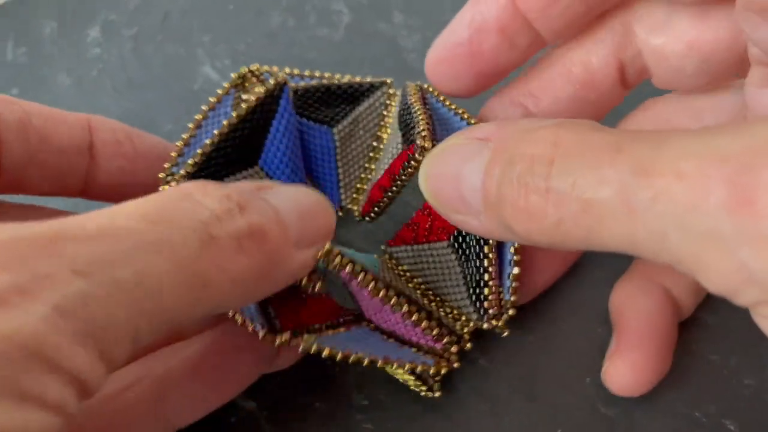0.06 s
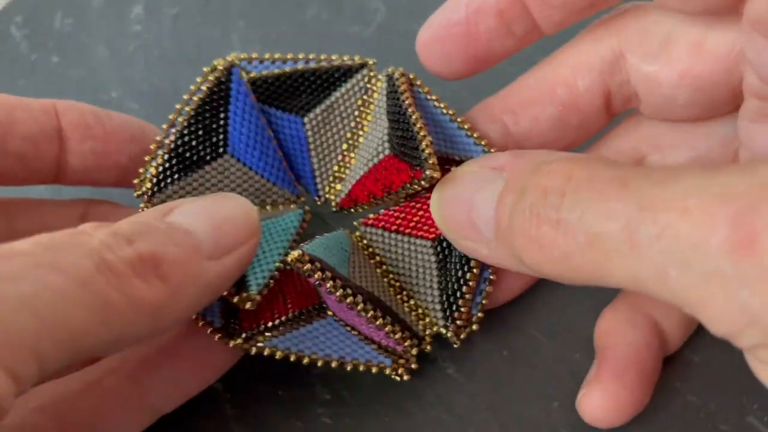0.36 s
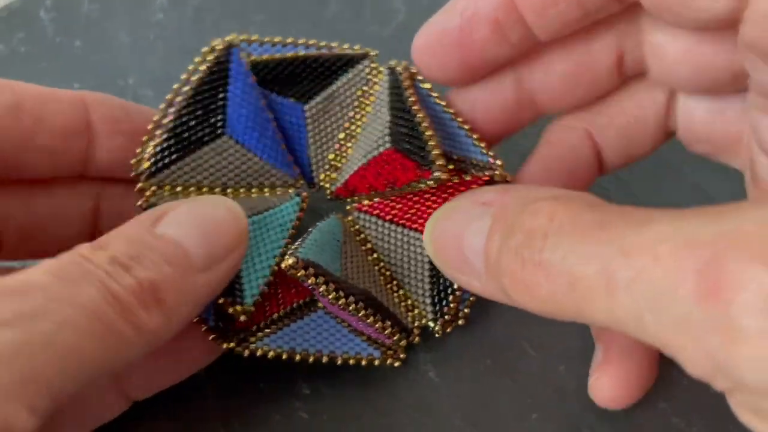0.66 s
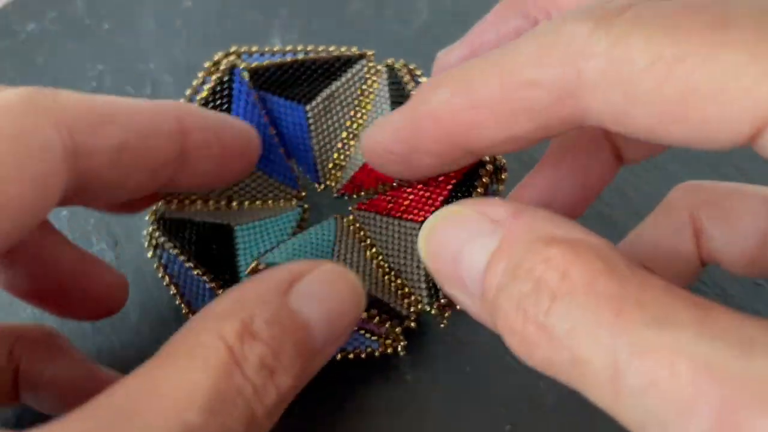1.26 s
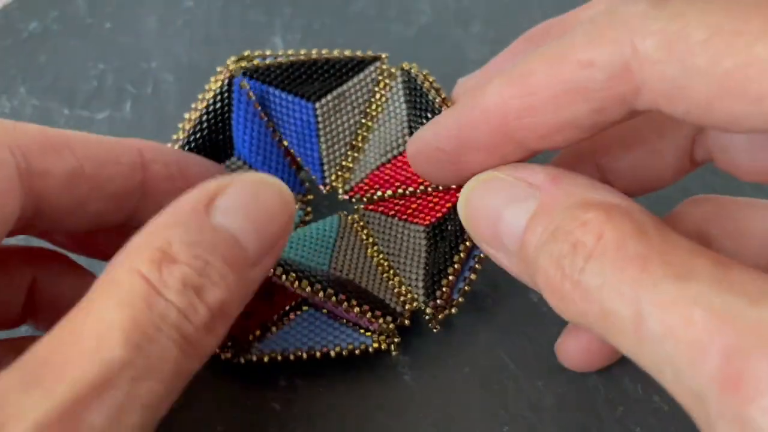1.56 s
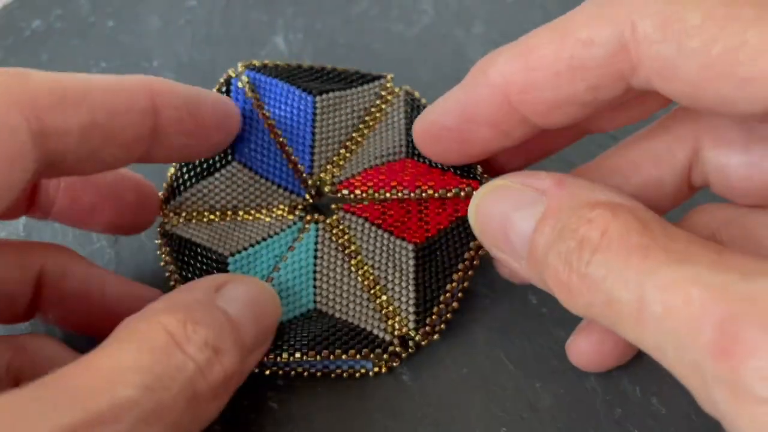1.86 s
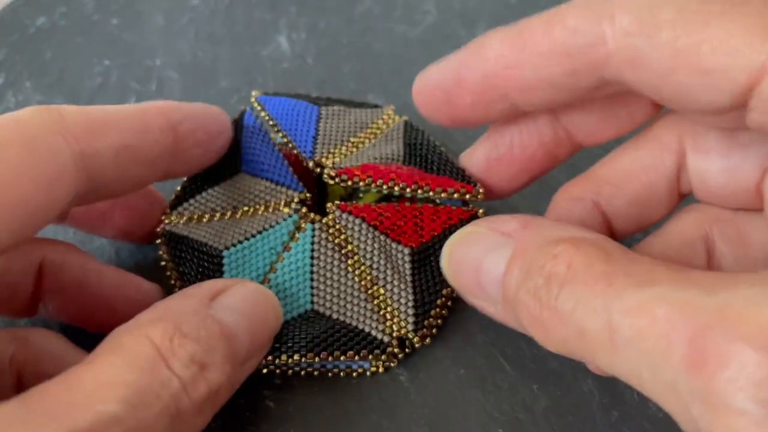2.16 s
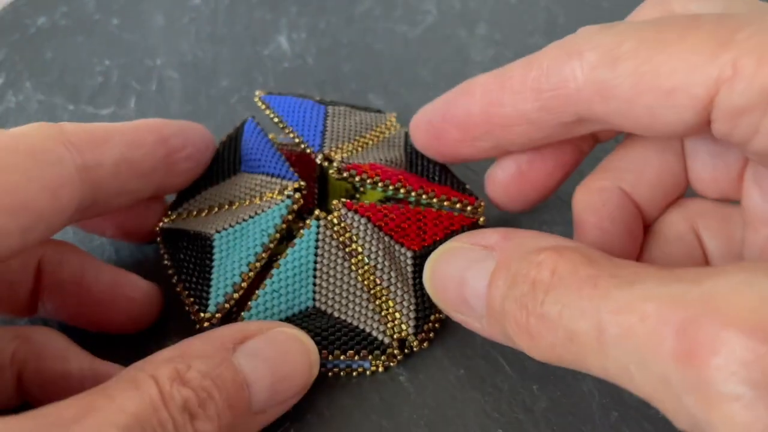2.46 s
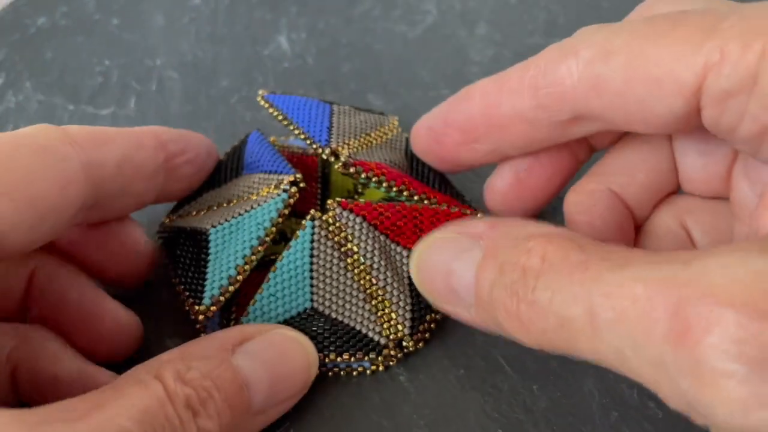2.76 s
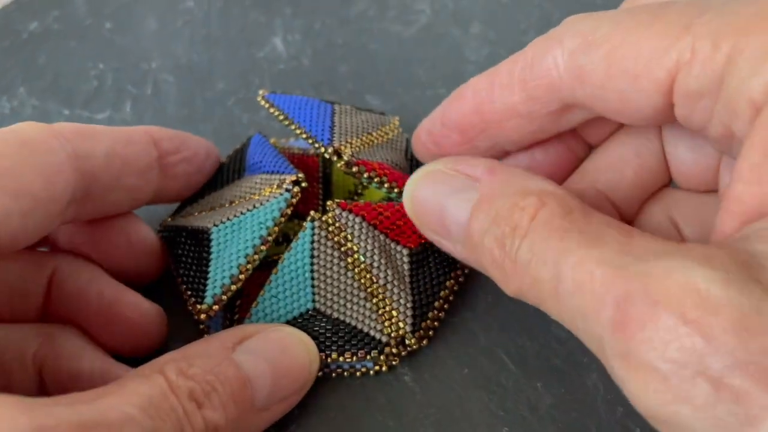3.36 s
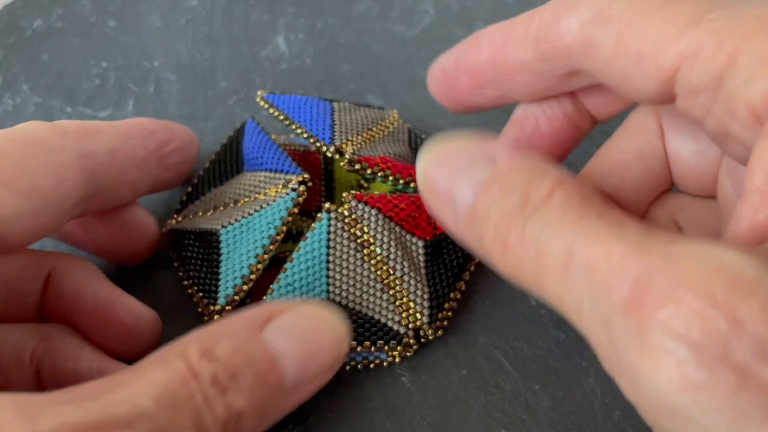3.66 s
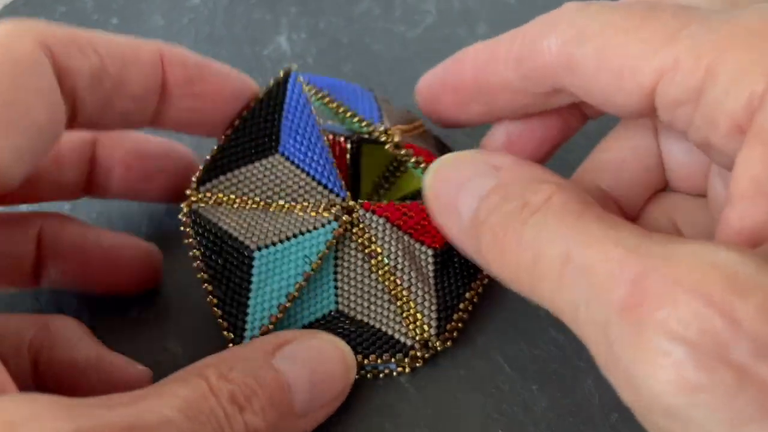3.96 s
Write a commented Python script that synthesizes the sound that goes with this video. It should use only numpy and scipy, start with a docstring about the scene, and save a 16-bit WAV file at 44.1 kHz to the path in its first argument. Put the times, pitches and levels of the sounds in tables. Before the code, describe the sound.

Close up, beadwork drags and taps on stone in short, soft bursts, creaks briefly near the middle, then moves more sparsely. Fingertips brush the beads and a few tick together, over a low indoor rumble.

```python
"""Beadwork handled on slate

Hands turn and fold a ring of beadwork on a slate slab in a quiet room. Stick-slip friction and knocks
of the beaded edges drive the slab's damped modes, which ring dully; one fold creaks. Fingertips hiss
over the beads, and now and then two beads collide with a tick. Underneath lie room noise, a faint hum
and a low drone that slowly climbs, like a distant engine."""
import sys
import numpy as np
from scipy import signal
from scipy.fft import rfft, irfft
from scipy.io import wavfile

SR = 44100
rng = np.random.default_rng(int(sys.argv[2]) if len(sys.argv) > 2 else 0)


def to_wav(s):
    """Save 16-bit WAV."""
    ch = np.atleast_2d(s).T  # columns
    pcm = np.round(np.clip(ch, -1, 1) * 32767)  # PCM
    wavfile.write(sys.argv[1], SR, pcm.astype(np.int16))


N = 176400
TIME = np.arange(N) / SR
FREQS = np.maximum(np.arange(N // 2 + 1) * SR / N, 1)

# room noise spectrum: (f/Hz, relative density/dB)
ROOM_SPECTRUM = [(30, -20.5), (42, 6.5), (65, 5), (105, -6.5), (170, -8), (270, -11), (370, -20.5),
                 (650, -21.5), (1200, -26), (2300, -44.5), (5000, -57.5), (15000, -107)]
# likeness of left and right in the room noise: (f/Hz, correlation)
ROOM_COHERENCE = [(50, 0.86), (130, 0.86), (300, 0.39), (1100, 0.033), (3000, 0.64)]
# balance of the room noise: (f/Hz, left minus right/dB)
ROOM_BALANCE = [(60, 0.5), (140, 1)]
# course of the drone: (t/s, f/Hz, level/dB)
DRONE_GLIDE = [(0, 47.1, -51.5), (.3, 47.24, -56), (1.4, 44.98, -59), (1.62, 47.1, -45),
               (1.95, 53.54, -44.5), (2.75, 53.48, -43), (3.17, 55.04, -45), (3.41, 61.58, -52.5),
               (3.85, 65.7, -46), (4, 67.34, -57)]
# lines of the hum: (f/Hz, level/dB)
HUM_LINES = [(92, -68.5), (120, -67), (143, -68)]
# hand strokes: (start t/s, duration/s, relative drag level/dB, relative brush level/dB)
HAND_STROKES = [(0.0, 0.079, -61.5, -72), (0.145, 0.12, -69, -78.5), (0.338, 0.16, -76, -77),
                (0.482, 0.033, -57.5, -70), (0.561, 0.17, -65.5, -67.5), (0.734, 0.07, -58.5, -67.5),
                (0.795, 0.18, -73.5, -78.5), (1.224, 0.056, -64.5, -74), (1.288, .065, -67.5, -76),
                (1.38, 0.045, -74, -88), (1.5, 0.13, -81.5, -92), (1.619, 0.04, -59.5, -75),
                (1.703, 0.052, -60.5, -74.5), (1.776, 0.051, -54.5, -72.5), (1.873, 0.068, -66, -76.5),
                (2.004, 0.12, -72, -91), (2.213, 0.052, -74.5, -84.5), (2.3, 0.13, -72.5, -82),
                (2.567, 0.051, -65, -85), (2.602, 0.027, -60, -72.5), (2.671, 0.028, -67.5, -77.5),
                (2.71, 0.098, -83.5, -85), (2.851, 0.05, -72.5, -81.5), (2.947, 0.057, -80.5, -76),
                (3.591, 0.047, -63.5, -73.5), (3.625, 0.021, -61, -71.5), (3.736, 0.022, -56.5, -71.5),
                (3.861, 0.064, -71, -74.5), (3.899, 0.034, -61.5, -70.5)]
# spectrum of skin sliding on beads: (f/Hz, relative density/dB)
SKIN_SPECTRUM = [(500, 11), (2500, 2), (4000, 4), (6000, 6), (7500, 9), (9500, 7), (12000, 3.5),
                 (15500, 7.5)]
# bead striking bead: (t/s, relative level/dB)
BEAD_TICKS = [(1.570, -59), (1.884, -46), (2.072, -46), (2.111, -46), (2.523, -56.5), (2.757, -56),
              (3.264, -57)]
# spectrum of the dry grit of slipping beads: (f/Hz, relative density/dB)
GRIT_SPECTRUM = [(300, 12), (700, -16), (1150, 28), (1500, 5), (2600, -19), (4200, 12), (7000, -14),
                 (15500, -23)]
# an edge slips and judders on the slab: (t/s, relative level/dB)
EDGE_KNOCKS = [(.004, -40), (.032, -41), (.055, -40), (.170, -46.5), (.195, -53), (.220, -46),
               (.497, -47.5), (.53, -46.5), (.619, -50), (.655, -61), (.691, -50), (.746, -47),
               (.769, -42.5), (1.238, -47.5), (1.273, -48.5), (1.295, -55), (1.351, -51), (1.55, -52),
               (1.619, -41), (1.693, -45.5), (1.732, -45), (1.791, -44), (1.813, -32.5), (1.884, -46.5),
               (1.924, -46.5), (1.962, -47), (2.024, -52.5), (2.238, -50.5), (2.617, -39), (2.688, -49.5),
               (3.033, -54.5), (3.894, -47.5), (3.914, -43)]
# where the beadwork bears on the slab: (t/s, dimensionless place)
CONTACT_PLACE = [(.2, -1.6), (.7, -0.019), (1.25, 0.83), (1.83, 1), (2.48, -0.042), (2.61, 0.89),
                 (2.69, 0.39), (3.6, -0.72), (3.76, 0.36)]
# slab modes: (f/Hz, bandwidth/Hz, gain/dB, phase lead of the left/rad, gain per unit place/dB)
SLAB_MODES = [(830.5, 23.5, 6.5, 0.23, 0), (1781, 27, -6, 0.93, 1.5), (1909, 82, -6.5, 0.24, -1.5),
              (3060, 18, -15.5, 1, 1), (3122, 45, -11, 0.28, -1.5), (3397, 48, -13, 0.57, 3),
              (4683, 45, -13.5, 0.18, -1), (5067, 59, -9, 0.18, 3), (5360, 59, -17.5, 0.21, -1),
              (7280, 100, -18.5, 0.072, -2)]
# phase between left and right in the contact sounds: (f/Hz, phase/rad, limited to pi in use)
TREBLE_STEREO_PHASE = [(6000, 0.2), (7300, 1.88), (8300, 4.35), (9400, 1.36), (11500, 0.25), (13600, 1.9),
                       (15200, 3.7)]

ROOM_DB, DRONE_PAN_DB, HUM_WAVER_DB = -51.5, -2.5, 4.5
STROKE_RISE_SHARE, STROKE_ARCH_DB = 0.56, 0.5   # rise time over duration; middle above ends
CATCHES_PER_S, CATCH_DECAY_S, CATCH_DEPTH = 130, 0.0024, 0.58
SKIN_GAIN_DB, GRIT_GAIN_DB = 4.5, -14.5
TICK_T60_S, TICK_DIRECT_DB, TICK_TO_SLAB_DB = 0.014, -11, -10.5
DRAG_TO_SLAB_DB, KNOCK_TO_SLAB_DB = -5.5, -4.5
JUDDER_SIGMA_S, RASP_GAIN, RASP_CORNER_HZ = 0.0027, 1.77, 1570
FAINT_KNOCKS_PER_S, FAINT_KNOCK_DB = 30, -61.5
CREAK_START_S, CREAK_LENGTH_S, CREAK_DB = 1.63, 0.225, -53   # the ring is folded flat
SLAB_PAN_DB, MODE_WANDER_SHARE, CONTACT_SPREAD, TOUCH_SPREAD_DB = 3.5, 0.0056, 0.85, 2.5
CUTOFF_HZ = 15750
SIDES = np.array([[.5], [-.5]])   # half of a difference to the left, half to the right


def from_db(db):
    """Amplitude ratio for a level in decibels."""
    return 10 ** (np.asarray(db) / 20)


def unit_rms(x):
    """Normalisation to unit mean power."""
    return x / np.sqrt(np.mean(np.abs(x) ** 2) + 1e-20)


def over_time(rows):
    """Linear interpolation of each column at every sample."""
    times, *columns = np.transpose(rows)
    return [np.interp(TIME, times, column) for column in columns]


def over_frequency(points):
    """Interpolation over log frequency at every spectral bin."""
    hz, value = np.transpose(points)
    return np.interp(np.log(FREQS), np.log(hz), value)


def pan(db):
    """Left and right gains for a level difference."""
    return from_db(SIDES * db)


def colour(x, spectrum):
    """Spectral shaping that conserves the power of white noise."""
    return irfft(rfft(x) * unit_rms(from_db(over_frequency(spectrum))), N)


def drift(corner_hz):
    """Slow fluctuation: low-passed Gaussian noise of unit rms."""
    return unit_rms(irfft(rfft(rng.standard_normal(N)) / (1 + (FREQS / corner_hz) ** 2), N))


def arrivals(per_s):
    """A Poisson process: true at the samples where an event falls."""
    return rng.random(N) < per_s / SR


def shot_noise(per_s, spread_db):
    """Independent impulses of random size and sign sum to a noise of unit rms."""
    sizes = from_db(spread_db * np.minimum(rng.exponential(1, N), 4))
    return unit_rms(sizes * rng.choice([-1, 1], N) * arrivals(per_s))


def impulses(rows):
    """One impulse for each row of (t/s, level/dB)."""
    times, db = np.transpose(rows)
    return np.bincount(np.clip(times * SR, 0, N - 1).astype(int), from_db(db), N)


def room_noise():
    """Partial coherence: a common and an opposed noise mix, nearly alike on both sides in the bass."""
    mid, side = rfft(rng.standard_normal((2, N)))
    coherence = over_frequency(ROOM_COHERENCE)
    spectra = np.sqrt(1 + coherence) * mid + np.sqrt(1 - coherence) * side * [[1], [-1]]
    noise = irfft(spectra * pan(over_frequency(ROOM_BALANCE)), N)
    return from_db(ROOM_DB) * unit_rms(colour(noise, ROOM_SPECTRUM))


def drone_and_hum():
    """Modulated tones: the drone glides in frequency; the hum wavers in amplitude and phase."""
    hz, db = over_time(DRONE_GLIDE)
    drone = from_db(db) * np.sin(2 * np.pi * np.cumsum(hz) / SR)
    hum = np.zeros(N)
    for line_hz, line_db in HUM_LINES:
        amplitude = from_db(line_db + HUM_WAVER_DB * drift(1.3))
        hum += amplitude * np.sin(2 * np.pi * line_hz * TIME + drift(4.5))
    return np.sqrt(2) * (drone * pan(DRONE_PAN_DB) + hum)


def stroke_envelope(levels_db, release_s, resting_db):
    """Incoherent addition: strokes sum in power, above a floor from fingers that are never still."""
    power = from_db(resting_db) ** 2
    for (start, length, *_), db in zip(HAND_STROKES, levels_db):
        age = TIME - start
        swell = .5 + .5 * np.tanh(2 * age / (STROKE_RISE_SHARE * length))
        arch_db = STROKE_ARCH_DB * (np.sin(np.pi * np.clip(age / length, 0, 1)) - .5)
        release = np.exp(-np.maximum(age - length, 0) / release_s)
        power = power + (from_db(db + arch_db) * swell * release) ** 2
    return np.sqrt(power)


def snagging_friction():
    """Relaxation: friction jumps whenever a row of beads snags, then falls back exponentially."""
    snags = rng.exponential(1, N) * arrivals(CATCHES_PER_S)
    excess = signal.lfilter([1], [1, -np.exp(-1 / (CATCH_DECAY_S * SR))], snags)
    return unit_rms(1 + CATCH_DEPTH * excess)


def skin_brushing(friction):
    """Roughness noise: skin sliding over tiny beads makes dense contacts that merge into a bright hiss."""
    envelope = stroke_envelope([row[3] for row in HAND_STROKES], release_s=0.026, resting_db=-91)
    hiss = colour(shot_noise(per_s=11000, spread_db=2), SKIN_SPECTRUM)
    return from_db(SKIN_GAIN_DB) * envelope * np.sqrt(friction) * hiss


def bead_ticks():
    """Impact transients: colliding beads give glassy bursts of exponentially decaying noise."""
    decay_per_sample = from_db(-60 / (TICK_T60_S * SR))
    envelope = signal.lfilter([1], [1, -decay_per_sample], impulses(BEAD_TICKS) + 1e-18)
    return signal.lfilter([.6], [1, -.5], envelope * rng.standard_normal(N))   # gentle low-pass


def bead_drag(friction):
    """Stick-slip friction: beads catch and slip on the stone, each slip an impulse of force."""
    pressure = stroke_envelope([row[2] for row in HAND_STROKES], release_s=0.024, resting_db=-88.5)
    return shot_noise(per_s=1500, spread_db=1.5) * pressure * friction


def edge_judder():
    """Resonant forcing: an edge judders at the lowest mode, briefly in a knock, longer in the creak."""
    hz, bandwidth = SLAB_MODES[0][:2]
    lag = np.arange(-SR // 20, SR // 20) / SR
    pulse = np.exp(-.5 * (lag / JUDDER_SIGMA_S) ** 2)
    faint_knocks = from_db(FAINT_KNOCK_DB) * rng.standard_normal(N) * arrivals(FAINT_KNOCKS_PER_S)
    folding = (TIME > CREAK_START_S) * (TIME < CREAK_START_S + CREAK_LENGTH_S)
    creak = from_db(CREAK_DB) * np.pi * bandwidth / SR * folding   # balances the mode's damping
    drive = impulses(EDGE_KNOCKS) + creak + faint_knocks
    envelope = signal.fftconvolve(drive, 2 * pulse / pulse.sum(), "same")
    pole = np.exp(-2 * np.pi * RASP_CORNER_HZ / SR)
    rasp = signal.lfilter([1 - pole], [1, -pole], rng.standard_normal(N))
    judder = np.sin(2 * np.pi * hz * TIME) + RASP_GAIN * rasp
    makeup = np.sqrt(SR / (4 * np.pi * bandwidth))   # cancels the resonator's input gain
    return from_db(KNOCK_TO_SLAB_DB) * makeup * envelope * judder


def slab_ringing(force):
    """Modal superposition: each damped mode answers the force with a coupling set by place and touch."""
    ringing = np.zeros((2, N))
    place, = over_time(CONTACT_PLACE)
    for hz, bandwidth, db, lead, place_db in SLAB_MODES:
        pole = np.exp(-np.pi * bandwidth / SR)
        wandering_hz = hz * (1 + MODE_WANDER_SHARE * drift(6))
        carrier = np.exp(2j * np.pi * np.cumsum(wandering_hz) / SR)
        touch_db = TOUCH_SPREAD_DB * (2 - SLAB_MODES[0][0] / hz) * drift(27)   # upper modes vary more
        coupling = from_db(place_db * place + touch_db) * (1 + CONTACT_SPREAD * rng.standard_normal(N))
        modal_force = force * coupling + 1e-18
        # shifted down to 0 Hz, the resonance is a one-pole decay
        amplitude = signal.lfilter([np.sqrt(2 * (1 - pole * pole))], [1, -pole], modal_force / carrier)
        ringing += from_db(db) * np.imag(amplitude * carrier * np.exp(1j * lead * SIDES))
    return ringing * pan(SLAB_PAN_DB)


def widen_treble(x):
    """Phase difference: the high treble is out of phase between left and right, and sounds wide."""
    phase = np.clip(over_frequency(TREBLE_STEREO_PHASE), 0, np.pi)
    return irfft(rfft(x) * np.exp(1j * phase * SIDES), N)


def scene():
    """Superposition: the contacts radiate directly and through the slab, over the room's background."""
    friction = snagging_friction()
    drag, ticks = bead_drag(friction), bead_ticks()
    force = from_db(DRAG_TO_SLAB_DB) * drag + edge_judder() + from_db(TICK_TO_SLAB_DB) * ticks
    grit = from_db(GRIT_GAIN_DB) * colour(drag, GRIT_SPECTRUM) * pan(SLAB_PAN_DB / 2)
    close = slab_ringing(force) + grit + skin_brushing(friction) + from_db(TICK_DIRECT_DB) * ticks
    return widen_treble(close) + room_noise() + drone_and_hum()


def record(dry):
    """Band limiting: a steep low-pass removes the highest treble."""
    return irfft(rfft(dry) / np.sqrt(1 + (FREQS / CUTOFF_HZ) ** 200), N)


dry = scene()
out = record(dry)
to_wav(out)
```